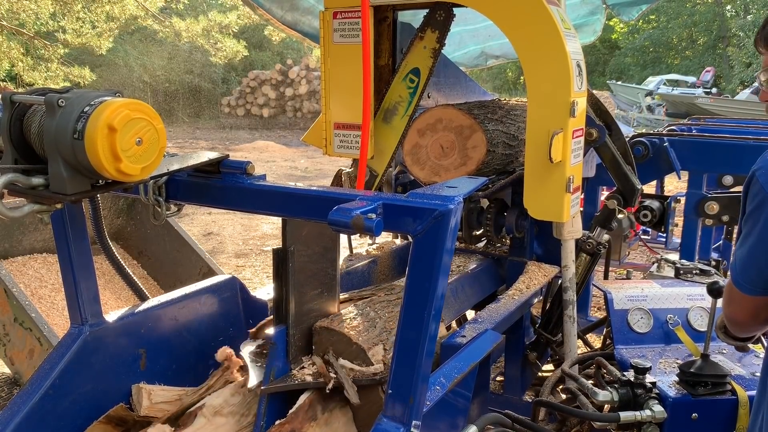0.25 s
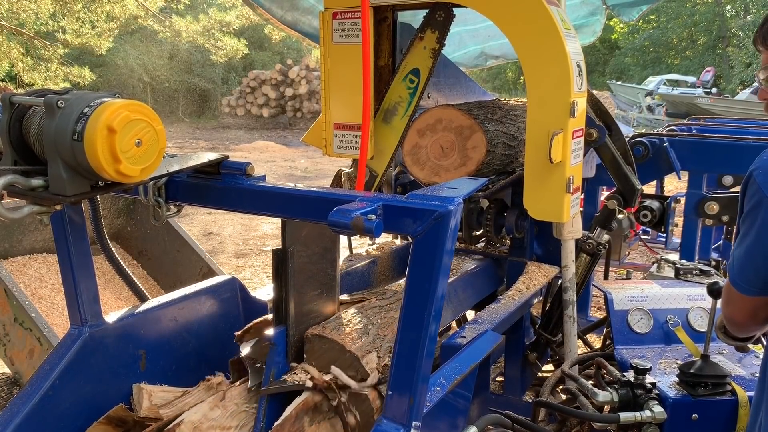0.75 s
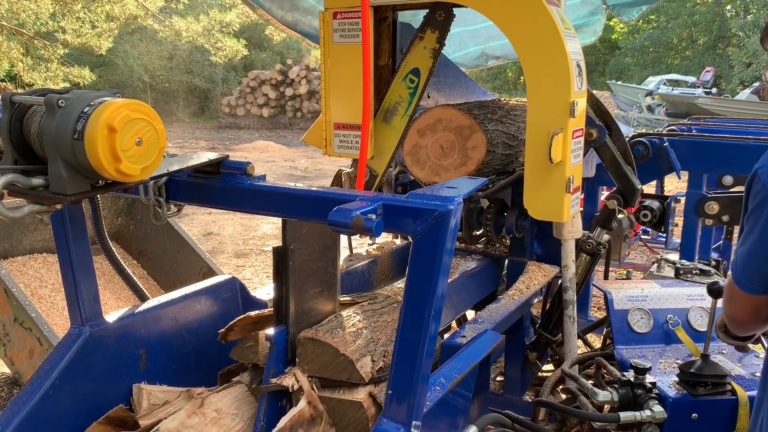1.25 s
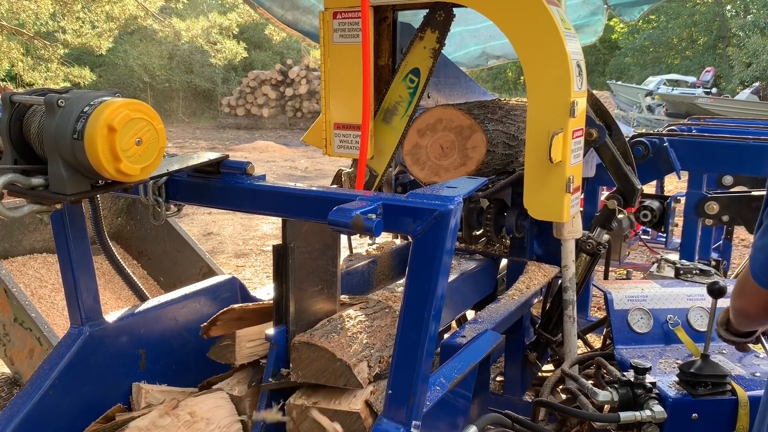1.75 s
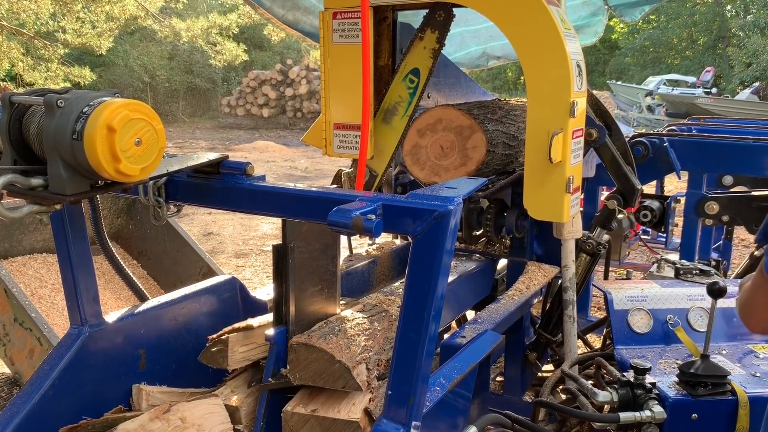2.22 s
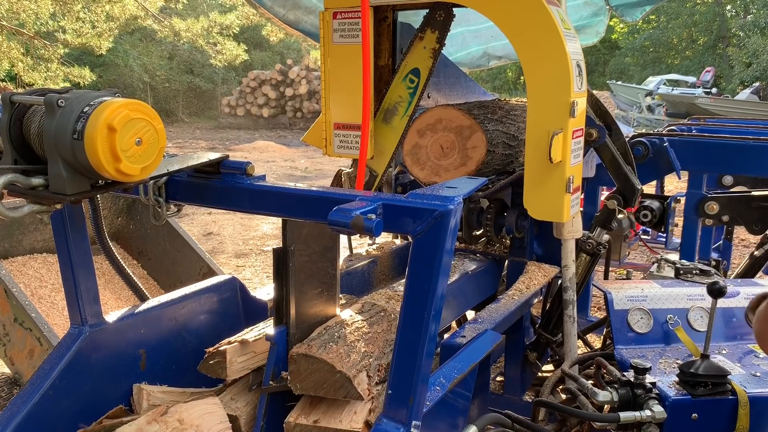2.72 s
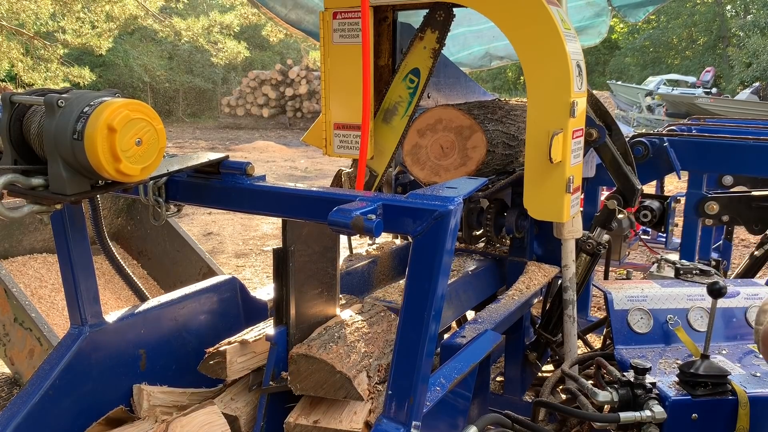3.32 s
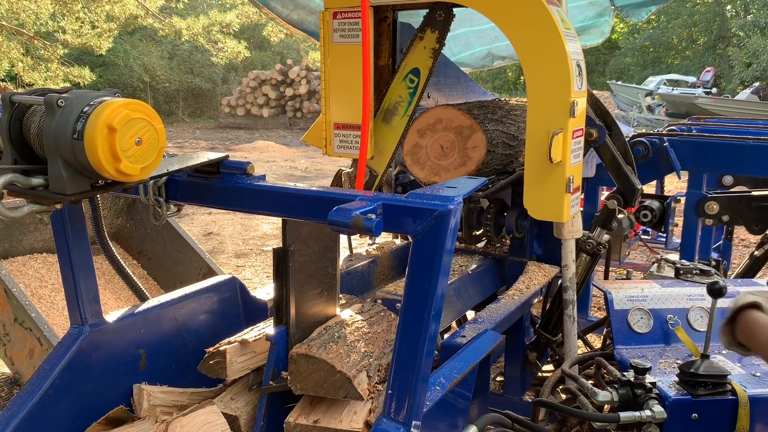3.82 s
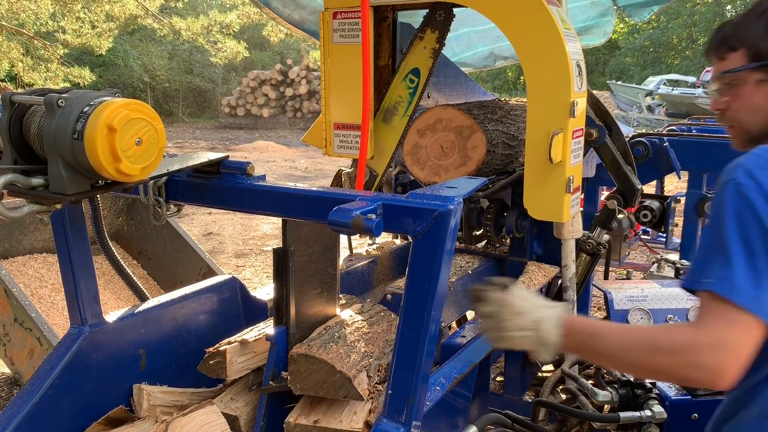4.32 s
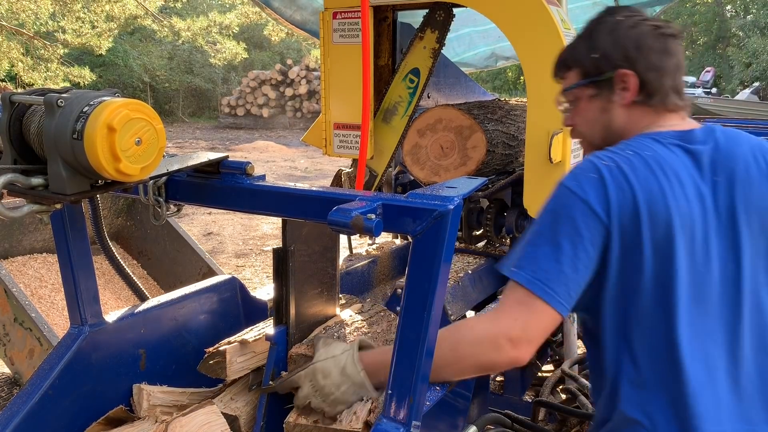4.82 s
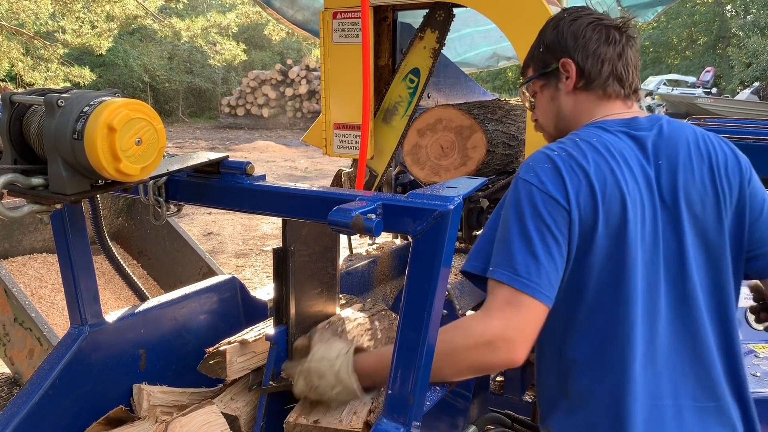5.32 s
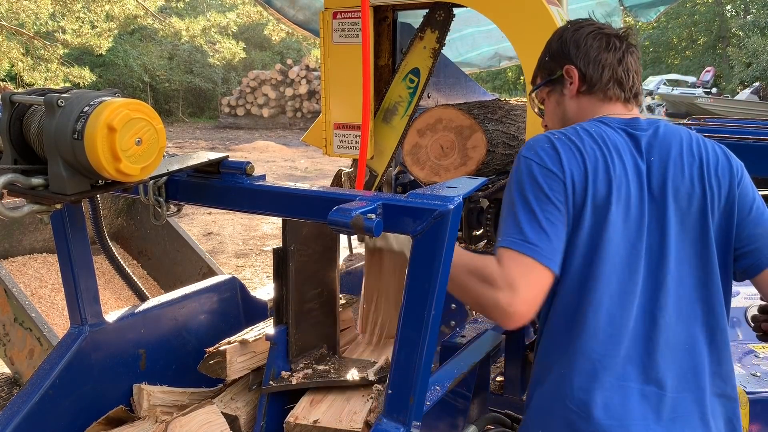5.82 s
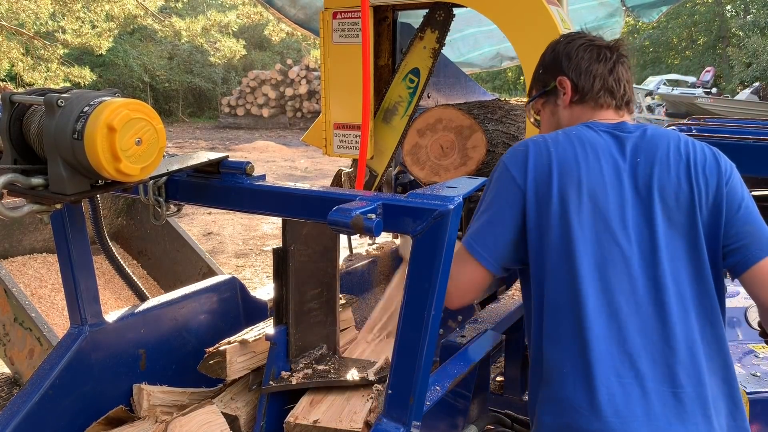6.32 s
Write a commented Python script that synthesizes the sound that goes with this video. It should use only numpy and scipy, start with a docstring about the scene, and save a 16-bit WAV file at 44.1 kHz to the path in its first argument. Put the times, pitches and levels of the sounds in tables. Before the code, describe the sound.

Outdoors, close to a firewood processor, a diesel throbs steadily at fast speed from start to end, with low rumble, dry valve clatter, bright oil hiss towards the right and a cluster of gear whines. A nearly pure hydraulic hum around 700 Hz swells and dips irregularly. Small ticks and a soft knock come at 0.1-0.4 s; a hard sharp crack snaps at 0.9, another strong one at 1.15, with splintering and more cracks to 1.3, and a dull thump near 1.37. A lesser snap at 1.85 marks the log giving way. From 2.35 to 2.55 split pieces crash into the steel trough in a loud, dense tumble of woody thumps, rumble and scraping. Softer knocks follow at 3.0 and 3.2-3.3. The pitch, highest around 2.3, sinks until 4.5; then the lighter-loaded engine and hum continue to 6.5, with a tiny wood crackle near 5.6.

```python
"""A diesel throbs outdoors beside the hum of a hydraulic pump: a firewood processor forces a log through its wedge.
Engine, pump and gears are tones locked to one crank angle; block noise and oil hiss are coloured, pulsing noise.
Wood cracks are short runs of fibre breaks that ring and echo, with finer splintering around some of them.
The split pieces land in a steel trough as thumps with ringing modes, and slide as dense noisy contacts."""
import sys
import numpy as np
from scipy import signal
from scipy.fft import rfft, irfft
from scipy.io import wavfile
from scipy.ndimage import uniform_filter1d

SR = 44100
rng = np.random.default_rng(int(sys.argv[2]) if len(sys.argv) > 2 else 0)


def store_wav(level_fs):
    """Save 16-bit WAV to argv[1]."""
    pcm = np.round(np.clip(np.atleast_2d(level_fs), -1, 1) * 32767)
    wavfile.write(sys.argv[1], SR, pcm.T.astype(np.int16))


N = 289296
TIME = np.arange(N) / SR
BINS_HZ = np.maximum(np.arange(N // 2 + 1) * SR / N, 1)

# Relative noise spectrum of the engine block and panels, also of rumbling wood: (frequency [Hz], density [dB per Hz])
RUMBLE_SPECTRUM = [(42, -13), (60, -11.5), (100, -4), (135, -3.5), (175, 4), (250, -6), (330, -2.5),
                   (430, -11.5), (600, -36)]
# Relative noise spectrum of the valve clatter, also of rustling bark: (frequency [Hz], density [dB per Hz])
CLATTER_SPECTRUM = [(250, -3.5), (450, 3), (600, -0.5), (800, 1), (1020, -2), (1230, -5), (1450, -8.5),
                    (1750, -11.5), (2400, -16), (5000, -56.5)]
# Relative noise spectrum of oil rushing through valves, also of scraping: (frequency [Hz], density [dB per Hz])
HISS_SPECTRUM = [(1200, -3), (2200, -3.5), (2500, -3), (2850, -1), (3250, 1.5), (3750, -4), (4150, 4.5),
                 (4700, 0.5), (5250, -3), (6400, -3.5), (7600, -9.5), (9600, -14.5)]

STROKE_END_S, EASE_S = 3.87, 1   # the ram's push ends, and the work on the engine eases off
LOG_GIVES_S, GIVE_S = 1.75, 0.09   # until the log gives way the ram is held back and less oil flows
TREBLE_LAG_MS = 0.437   # delay of the left side for the bright sounds


def from_db(db):
    """Level to amplitude: 20 dB is a factor of ten."""
    return 10 ** (np.asarray(db) / 20)


def rms_one(x):
    """Normalisation to unit mean power."""
    return x / np.sqrt(np.mean(x ** 2) + 1e-20)


def in_time(rows):
    """Linear interpolation of each column of a time curve at every sample."""
    s, *columns = np.transpose(rows)
    return [np.interp(TIME, s, column) for column in columns]


def at_bins(points):
    """Interpolation of a short spectrum on a logarithmic frequency axis."""
    hz, value = np.transpose(points)
    return np.interp(np.log(BINS_HZ), np.log(hz), value)


def until(end_s, ease_s):
    """Linear transition from 1 to 0, centred on a moment."""
    return np.clip(.5 + (end_s - TIME) / ease_s, 0, 1)


def drift(rate):
    """Random modulation: low-passed noise of unit rms, with its corner at the rate in Hz."""
    return rms_one(irfft(rfft(rng.standard_normal(N)) / (1 + (BINS_HZ / rate) ** 2), N))


def passed(x, hz, kind, order=2):
    """Butterworth filtering, flat within the pass band."""
    return signal.sosfilt(signal.butter(order, np.clip(hz, 10, .45 * SR), kind, fs=SR, output="sos"), x)


def ring(x, hz, t60):
    """Damped resonance: a unit click starts a decaying sine of unit height."""
    radius, angle = from_db(-60 / (t60 * SR)), 2 * np.pi * hz / SR
    return signal.lfilter([0, np.sin(angle)], [1, -2 * radius * np.cos(angle), radius * radius], x + 1e-18)


def add(out, s, sound):
    """Superposition of a stereo sound starting at time s."""
    start = round(s * SR)
    out[:, start:start + sound.shape[1]] += sound[:, :N - start]


def placed(x, left_db, left_lag_ms):
    """Direction from level and time differences: the left is louder by left_db and later by left_lag_ms."""
    left, right = rfft(np.broadcast_to(x, (2, N)))
    left = left * np.exp(-2j * np.pi * BINS_HZ * left_lag_ms / 10 ** 3)
    return irfft([left * from_db(left_db / 2), right * from_db(-left_db / 2)], N)


def coloured(pair, spectrum):
    """Resonant colouring and partial coherence: two excitations become one stereo sound of unit rms."""
    # Left-right likeness, lowest in the middle range: (frequency [Hz], likeness [0 to 1])
    likeness = [(60, 1), (250, 0.93), (500, 0.64), (1000, 0.4), (2000, 0.1), (4000, 0.21), (5200, 0.98),
                (5600, 1)]
    # Resonances of steel guards and pipes: (frequency [Hz], full width at half the lift [Hz], lift [dB])
    panels = [(193.4, 23, 2.5), (262.7, 5.5, 9), (977, 27, 6), (1400, 6.2, 3), (1818, 61, 4),
              (2134, 11, 10.5), (3016, 140, 4)]
    hz = np.transpose(spectrum)[0]
    low_skirt = 1 + (hz[0] / 2 / BINS_HZ) ** 4
    high_skirt = 1 + (BINS_HZ / 2 / hz[-1]) ** 4
    skirts = 1 / np.sqrt(low_skirt * high_skirt)
    panels_db = sum(db / (1 + (2 * (BINS_HZ - centre) / width) ** 2) for centre, width, db in panels)
    mid, side = rfft(pair) * from_db(at_bins(spectrum) + panels_db) * skirts
    alike = np.clip(at_bins(likeness), 0, 1)
    mid, side = mid * np.sqrt(1 + alike), side * np.sqrt(1 - alike)
    return rms_one(irfft([mid + side, mid - side], N))


def repeating(cycles, loose, size=2800):
    """Cyclic excitation: a slowly changing run of impacts recurs each engine cycle; a loose share never repeats."""
    loose = np.clip(loose, 0, 1)
    position = (cycles % 1 * size).astype(int)
    patterns = rng.laplace(size=(2, 2, size))[..., position]
    blend = drift(0.81)
    steady = rms_one(np.cos(blend) * patterns[0] + np.sin(blend) * patterns[1])
    return np.sqrt(1 - loose) * steady + np.sqrt(loose) * rng.standard_normal((2, N))


def valves(cycles, flicker_db):
    """Turbulent flow noise: oil hisses with a trace of the engine cycle and grows once the log gives way."""
    # Direction of the hiss, mostly on the right: (frequency [Hz], left above right [dB])
    hiss_sides = [(2000, -4.5), (2900, -3.5), (3400, -0.5), (3850, -0.5), (4100, -7), (4750, -2), (5350, 0)]
    flow = repeating(cycles, loose=0.49) * from_db(flicker_db * drift(37))
    level_db = -32 - 1.1 * until(LOG_GIVES_S, GIVE_S)
    hiss = coloured(flow, HISS_SPECTRUM) * from_db(level_db)
    return placed(hiss, left_db=at_bins(hiss_sides), left_lag_ms=TREBLE_LAG_MS)


def gears(cycles, rpm, waver_db, wobble):
    """Resonance excited by order-locked tones: each whine swells as the speed nears a resonance of the frame."""
    # Gear whines: (multiple of the engine cycle [rounded when used], best speed [rev/min], level there [dB])
    whine_rows = [(34, 1797, -51), (36, 1812, -39.5), (39, 1790, -40.5), (42, 1895, -51.5), (44, 1843, -35),
                  (46, 1842, -42), (48, 1815, -35.5), (48, 1868, -35.5), (54, 1880, -39), (55, 1795, -41),
                  (56, 1790, -52.5), (62.96, 1850, -41.5), (63.2, 1880, -38.5), (66.1, 1830, -48),
                  (67.1, 1820, -41), (70.5, 1830, -50), (74.2, 1810, -52), (94.1, 1788, -46),
                  (97, 1826, -44), (98.4, 1832, -49), (164, 1890, -48.5)]
    half_power_rpm = 8.7   # this far from its best speed a whine has half the power
    held_db = -2 * until(LOG_GIVES_S, GIVE_S)
    out = np.zeros((2, N))
    for multiple, best_rpm, db in whine_rows:
        swell = 1 / np.sqrt(1 + ((rpm - best_rpm) / half_power_rpm) ** 2)
        # separate paths to the two sides shift the phase
        turns = round(multiple) * cycles + rng.random() + rng.random((2, 1)) / 3
        angle = 2 * np.pi * turns + wobble * drift(3.8)
        out += swell * from_db(db + waver_db * drift(4.1)) * np.sqrt(2) * np.sin(angle)
    return placed(out * from_db(held_db), left_db=-1.0, left_lag_ms=0.057)


def pump(cycles):
    """Flow ripple at the tooth-passing frequency: twelve teeth a revolution give a nearly pure hum."""
    # Hum following the oil pressure: (time [s], level [dB])
    hum_curve = [(0.0, -23.5), (0.07, -20.5), (0.43, -29.5), (0.61, -18.5), (0.72, -15.5), (0.85, -22.5),
                 (0.98, -29), (1.15, -18.5), (1.3, -27), (1.5, -27), (1.76, -29.5), (1.88, -36),
                 (2.0, -25.5), (2.1, -27.5), (2.22, -16.5), (2.34, -20), (2.45, -47), (2.57, -36),
                 (2.66, -21), (2.78, -21.5), (2.88, -25), (3.0, -16), (3.18, -20), (3.27, -31), (3.4, -27),
                 (3.5, -41), (3.72, -39), (3.82, -30.5), (4.1, -28), (4.5, -22.5), (4.7, -25.5),
                 (5.8, -21.5), (6.3, -24.5), (6.55, -22)]
    teeth_per_cycle = 24   # one engine cycle is two revolutions
    level_db, = in_time(hum_curve)
    angle = 2 * np.pi * teeth_per_cycle * cycles + .05 * drift(8)
    hum = from_db(level_db + 1.0 * drift(9.9)) * np.sqrt(2) * np.sin(angle)
    return placed(hum, left_db=0.5, left_lag_ms=0.16)


def engine(cycles, firing_depth, clatter_depth):
    """Amplitude modulation by firing: block rumble and valve clatter pulse four times each engine cycle."""
    load, held = until(STROKE_END_S, EASE_S), until(LOG_GIVES_S, GIVE_S)
    firing = np.cos(2 * np.pi * 4 * cycles)
    rumble = coloured(repeating(cycles, loose=1.0) * (1 + firing_depth * firing), RUMBLE_SPECTRUM)
    clatter = coloured(repeating(cycles, loose=0.49) * (1 + clatter_depth * firing), CLATTER_SPECTRUM)
    # level running light, then its changes while the ram pushes and while it is held
    rumble_db = -29 - 1.0 * load
    clatter_db = -27.5 + 0.5 * load - 1.34 * held
    return (placed(rumble * from_db(rumble_db), left_db=2.0, left_lag_ms=0.32)
            + placed(clatter * from_db(clatter_db), left_db=4.0, left_lag_ms=0.25))


def exhaust(cycles, waver_db, throb_db, throb_count=3, chug_count=6):
    """Harmonic synthesis: low tones throb; load aligns the next into a chug; the pipe scatters the others' phases."""
    # Exhaust tones: (multiple of the two-revolution cycle, level running light [dB], level under load [dB])
    tones = [(1, -32, -40.5), (2, -18, -19), (3, -31, -33.5), (4, -33.5, -31), (5, -30.5, -34.5),
             (6, -40.5, -37), (7, -54, -48), (8, -41, -35.5), (9, -38.5, -47.5), (10, -43.5, -46),
             (11, -39.5, -52.5), (12, -31, -35.5), (13, -40, -46.5), (14, -50.5, -44.5), (16, -37.5, -43.5),
             (18, -51, -41), (19, -42, -47.5), (21, -38, -46), (22, -43, -39), (23, -43, -47)]
    load, out = until(STROKE_END_S, EASE_S), np.zeros(N)
    for k, (multiple, light_db, loaded_db) in enumerate(tones):
        if k < throb_count:
            scatter = 0
        elif k < chug_count:
            scatter = 1 - load
        else:
            scatter = 1
        phase = round(multiple) * cycles + scatter * (rng.random() - .5)
        unsteady_db = throb_db if k < throb_count else waver_db
        db = light_db + load * (loaded_db - light_db) + unsteady_db * drift(15.0)
        out += from_db(db) * np.sqrt(2) * np.cos(2 * np.pi * phase)
    return placed(out, left_db=-2.0, left_lag_ms=0.039)


def slides(grain_db):
    """Friction as dense random contacts: sliding wood gives a shudder, rumble, rustle and a longer bright scrape."""
    # Pieces sliding over steel: (middle [s], spread as standard deviation [s], rumble [dB], bark rustle [dB],
    # scrape [dB])
    slide_rows = [(2.443, 0.14, -21.5, -28, -33.5), (3.275, 0.13, -26.5, -34, -52)]
    shake_hz, shake_db = (45.3, 77), 0   # shudder of the whole trough; level against its rumble
    drag_spread = 1.4   # the scrape lasts this many times as long as the rumble
    contacts = rng.standard_normal((2, N)) * from_db(grain_db * drift(75))
    rumble = coloured(contacts, RUMBLE_SPECTRUM)
    rustle = coloured(contacts, CLATTER_SPECTRUM)
    scrape = coloured(contacts, HISS_SPECTRUM)
    rumble = rumble + from_db(shake_db) * rms_one(passed(contacts[0], shake_hz, "band"))
    low, high = np.zeros((2, 2, N))
    for s, spread_s, rumble_db, rustle_db, scrape_db in slide_rows:
        away = ((TIME - s) / spread_s) ** 2 / 2
        low += np.exp(-away) * (from_db(rumble_db) * rumble + from_db(rustle_db) * rustle)
        high += np.exp(-away / drag_spread ** 2) * from_db(scrape_db) * scrape
    low_placed = placed(low, left_db=1.5, left_lag_ms=0.089)
    return low_placed + placed(high, left_db=-0.5, left_lag_ms=TREBLE_LAG_MS)


def knocks(spread, trough_db, crunch_db, crunch_t60, size=16384):
    """Modal impact: a landing thumps, rings the trough and crunches bark; soft contacts reach only low modes."""
    # Landings: (time [s], level [dB], thump [Hz], thump T60 [s], rattle against thump [dB], contact low-pass [Hz])
    landings = [(0.1, -21, 130, 0.06, 5, 905), (1.368, -13.5, 188, 0.17, -12, 300),
                (2.357, -15.5, 200, 0.041, 2, 560), (2.386, -7, 277, 0.066, -14, 900),
                (2.395, -3, 128, 0.046, -12.5, 900), (2.419, -5, 243, 0.04, -14, 800),
                (2.441, -3, 181, 0.06, -6, 450), (2.456, -6, 174, 0.088, 0.5, 497),
                (2.4918, -8.5, 727, 0.037, -1, 1000), (2.5, -7, 232, 0.033, 2, 1250),
                (2.545, -11, 268, 0.13, -8, 400), (2.988, -13, 248, 0.043, -2, 500),
                (3.214, -18, 167, 0.23, -8, 330), (3.221, -12.5, 448, 0.14, -7, 400),
                (3.262, -12, 275, 0.21, -8, 330), (3.275, -13.5, 446, 0.12, -11, 447),
                (3.299, -11, 164.6, 0.26, -6, 330)]
    # Modes of the loaded trough: (frequency [Hz], relative level [dB], T60 [s])
    trough_modes = [(88.5, -3.5, 0.16), (130, -11.5, 0.18), (162.5, 2, 0.073), (245, 2.5, 0.075),
                    (273, -2, 0.33), (429, -2.5, 0.076), (447, -2, 0.092), (537, 2.5, 0.18),
                    (663, -2, 0.14), (703, -4.5, 0.1), (910, 3.5, 0.09), (930, -8, 0.039), (1343, -7, 0.22)]
    contact_s = 0.0014   # bark cushions each landing for this long
    out, t = np.zeros((2, N)), np.arange(size) / SR
    for s, db, thump_hz, thump_t60, rattle_db, contact_hz in landings:
        body = np.zeros((2, size))
        for hz, mode_db, t60 in trough_modes:
            # the place of the blow varies each mode's sign, level and balance
            strength = rng.choice([-1, 1]) * from_db(mode_db + rng.standard_normal())
            strength = strength * (1 + spread * rng.standard_normal((2, 1)))
            body += strength * np.sin(2 * np.pi * hz * t) * from_db(-60 * t / t60)
        bark = rng.standard_normal(size) + 2 * spread * rng.standard_normal((2, size))
        crunch = bark * from_db(crunch_db - 60 * t / crunch_t60)
        rattle = (from_db(trough_db) * body + crunch) * np.minimum(t / contact_s, 1)
        rattle = passed(rattle, contact_hz, "low", order=3)
        thump = np.sin(2 * np.pi * thump_hz * t) * from_db(-60 * t / thump_t60)
        hit = passed(thump + from_db(rattle_db) * rattle, thump_hz / 3, "high")
        peak_power = uniform_filter1d(hit[0] ** 2 + hit[1] ** 2, size=512).max()
        add(out, s, from_db(db) * hit / np.sqrt(2 * peak_power))
    return placed(out, left_db=3.0, left_lag_ms=0.025)


def splinters(spread_db, ring_cycles, count=12):
    """Random impulses exciting resonators: small fibres give way, each ringing briefly at one of a set of pitches."""
    # Wedge biting or a piece pulled free: (middle [s], spread as standard deviation [s], level [dB])
    splintering = [(0.196, 0.055, -39), (0.875, 0.026, -41), (1.2, 0.063, -33), (5.56, 0.05, -43)]
    fibres_per_s, lowest_hz, highest_hz = 120, 1470, 8800
    sizes = from_db(spread_db * np.minimum(rng.exponential(1, N), 3)) * rng.choice([-1, 1], N)
    clicks = sizes * (rng.random(N) < fibres_per_s / SR)
    dealt = rng.integers(0, count, N)   # which pitch each click rings
    crackle = np.zeros(N)
    for k, hz in enumerate(np.geomspace(lowest_hz, highest_hz, count)):
        crackle += ring(clicks * (dealt == k), hz, ring_cycles / hz)
    level = sum(from_db(db) * np.exp(-((TIME - s) / spread_s) ** 2 / 2) for s, spread_s, db in splintering)
    return placed(level * rms_one(crackle), left_db=3.0, left_lag_ms=TREBLE_LAG_MS)


def cracks(ring_db, ring_t60, echo_db, echo_t60, echo_top_hz, fine_db, first_db, size=8192, count=16):
    """Brittle fracture: a hard break, then thick fibres amid fine tearing; the splinter rings and the frame echoes."""
    # Wood splitting: (time [s], run length [s], body [dB], bite [dB], top [dB], lower ring [Hz], upper ring [Hz])
    crack_rows = [(0.117, 0.004, -33, -38, -34, 905, 6500), (0.194, 0.0064, -30, -27, -30, 2010, 4670),
                  (0.221, 0.0027, -47, -50, -27, 4400, 6600), (0.393, 0.0061, -27, -42, -50, 1420, 1760),
                  (0.862, 0.0078, -32, -26.5, -42, 3000, 4460),
                  (0.898, 0.00042, -11.5, -10, -14, 3060, 6450), (0.9008, 0.001, -15, -18, -36, 1660, 4850),
                  (1.012, 0.002, -35, -30, -43, 2100, 4400), (1.076, 0.0039, -29, -23.5, -18, 6900, 8700),
                  (1.105, 0.006, -32, -29.5, -40, 4270, 6900), (1.148, 0.0053, -14, -8, -11, 2090, 6600),
                  (1.189, 0.0045, -30, -26, -29, 4480, 6500), (1.214, 0.0029, -23.5, -24, -31, 4400, 6950),
                  (1.2695, 0.00091, -22, -15, -32, 2600, 4360), (1.2713, 0.0013, -14, -10, -24, 1030, 4440),
                  (1.552, 0.0036, -45, -28, -35, 4570, 8660), (1.716, 0.006, -32, -28, -38, 4600, 6800),
                  (1.8488, 0.0008, -34, -23, -25, 4300, 6500), (1.8535, 0.0008, -21, -17, -18, 4340, 6500),
                  (5.64, 0.0025, -43, -41, -25, 6600, 8350)]
    # Bands of body, bite and top: (lower edge [Hz], upper edge [Hz])
    crack_bands = [(600, 2100), (2300, 5300), (5700, 9100)]
    break_gap_s = 0.0009   # mean time between the breaks of thick fibres
    tear_s = 0.0026   # after its run a crack fades by 20 dB in this time
    out, t = np.zeros((2, N)), np.arange(size) / SR
    for s, run_s, body_db, bite_db, top_db, low_hz, high_hz in crack_rows:
        fibres = from_db(fine_db) * rng.standard_normal(size)
        breaks = np.cumsum(break_gap_s * (.5 + rng.random(count)))
        fibres[(breaks * SR).astype(int)] += rng.choice([-1, 1], count)
        fibres[0] = from_db(first_db)
        snap = fibres * from_db(-20 * np.maximum(t - run_s, 0) / tear_s)
        direct = np.zeros(size)
        for db, edges in zip((body_db, bite_db, top_db), crack_bands):
            band = passed(snap, edges, "band")
            peak_power = uniform_filter1d(band ** 2, size=128, mode="constant").max()
            direct += from_db(db) * band / np.sqrt(peak_power)
        rings = sum(rms_one(ring(direct, hz, ring_t60)) for hz in (low_hz, high_hz))
        direct = direct + from_db(ring_db) * direct.std() * rings
        # the echo is the crack convolved with decaying noise
        scatter = rng.standard_normal((2, size)) * from_db(-60 * t / echo_t60)
        scatter = passed(rms_one(scatter) / np.sqrt(size), echo_top_hz, "low")
        echo = signal.fftconvolve(scatter, direct[None], axes=1)[:, :size]
        add(out, s, direct + from_db(echo_db) * echo)
    return placed(out, left_db=-0.5, left_lag_ms=TREBLE_LAG_MS)


def scene():
    """Superposition: one crank angle drives engine, pump and gears; the wood sounds on top."""
    # Engine speed: (time [s], speed [rev/min])
    speed_curve = [(0.0, 1791), (0.44, 1838), (1.1, 1876), (1.5, 1881), (2.3, 1906), (2.5, 1900),
                   (2.7, 1873), (3.3, 1834), (3.7, 1818), (4.5, 1798), (5.2, 1800), (6.56, 1791)]
    rpm, = in_time(speed_curve)
    cycles = .5 + np.cumsum(rpm / 60 / 2) / SR   # two revolutions a cycle
    machine = exhaust(cycles, waver_db=1.8, throb_db=0.55)
    machine = machine + engine(cycles, firing_depth=0.42, clatter_depth=0.032)
    hydraulics = pump(cycles) + gears(cycles, rpm, waver_db=2.5, wobble=0.6) + valves(cycles, flicker_db=.5)
    splitting = cracks(ring_db=-7.0, ring_t60=0.018, echo_db=-2.0, echo_t60=0.086, echo_top_hz=7000,
                       fine_db=-21, first_db=12.5)
    splitting = splitting + splinters(spread_db=-5, ring_cycles=37)
    falling = knocks(spread=0.3, trough_db=-8, crunch_db=6, crunch_t60=0.06) + slides(grain_db=1.5)
    return machine + hydraulics + splitting + falling


def record(dry):
    """Clipping and band-limiting: peaks are cut off at 0.88, then a steep low-pass removes the top."""
    cutoff_hz = 9640
    limited = np.clip(dry, -.88, .88)
    return irfft(rfft(limited) / np.sqrt(1 + (BINS_HZ / cutoff_hz) ** 130), N)


dry = scene()
out = record(dry)
store_wav(out)
```